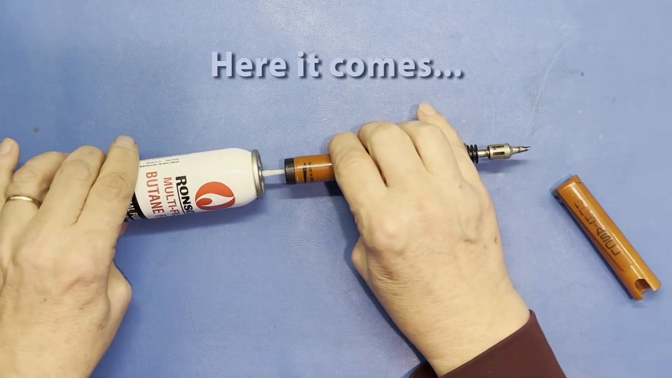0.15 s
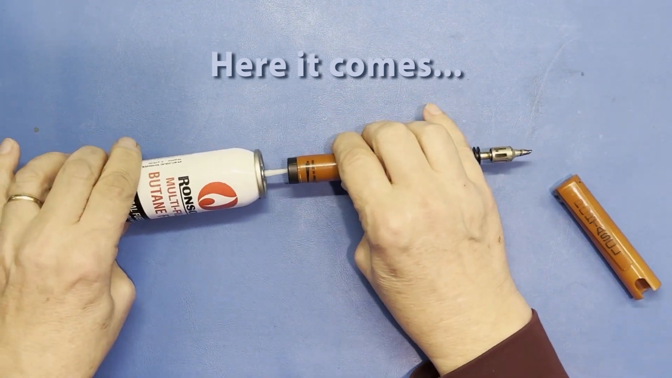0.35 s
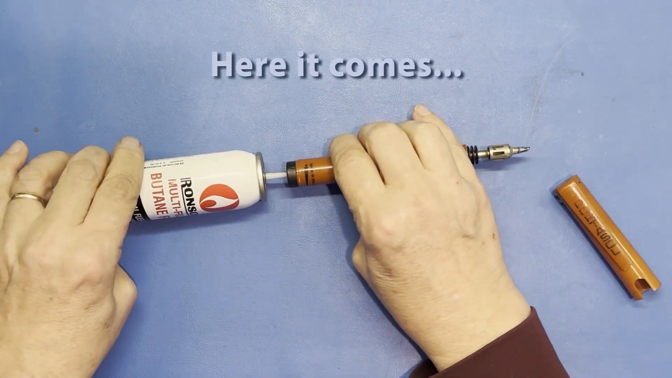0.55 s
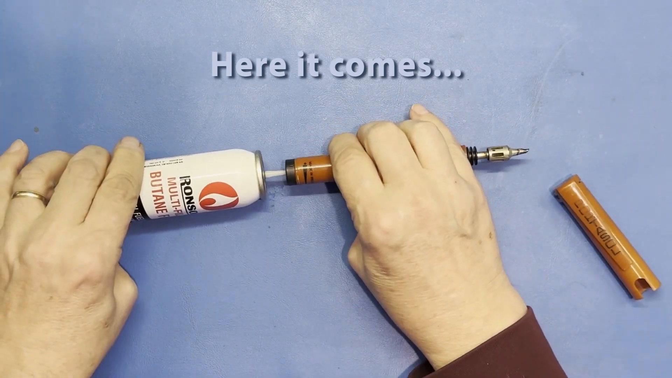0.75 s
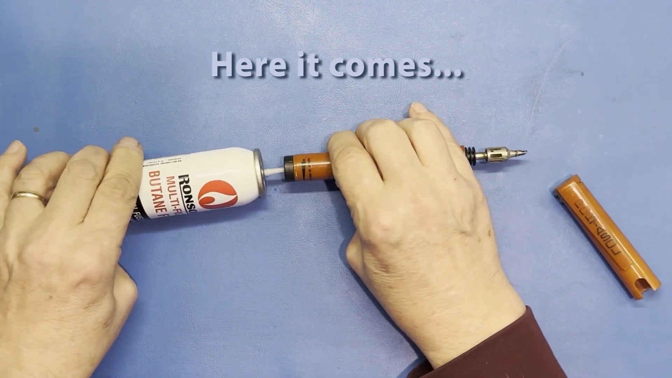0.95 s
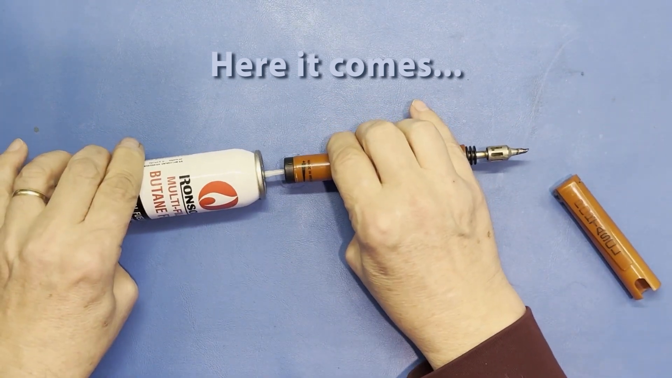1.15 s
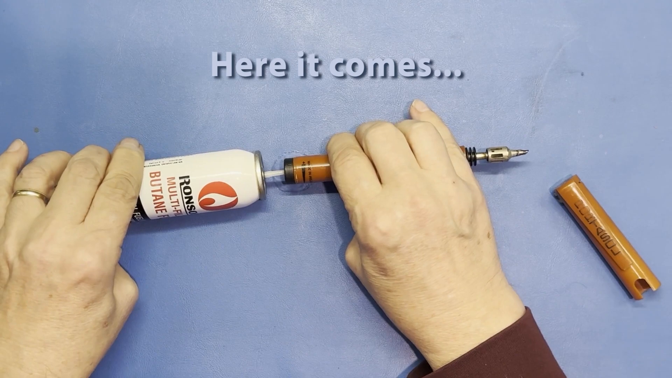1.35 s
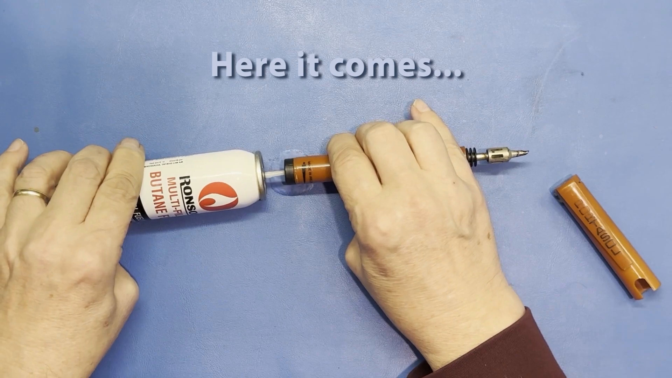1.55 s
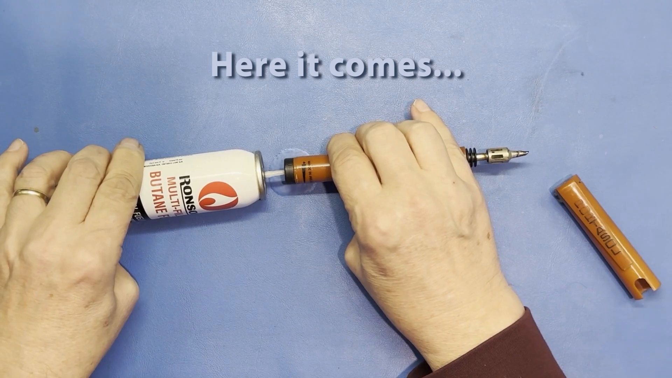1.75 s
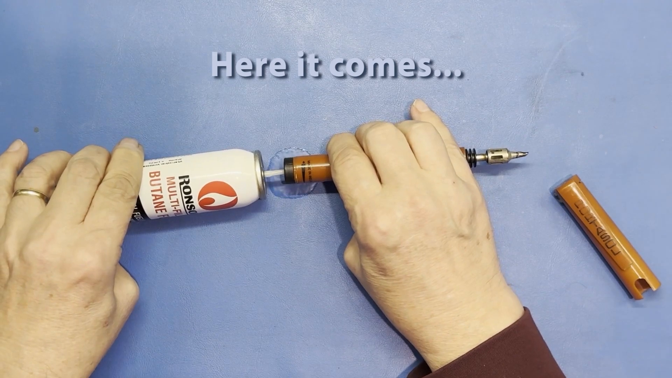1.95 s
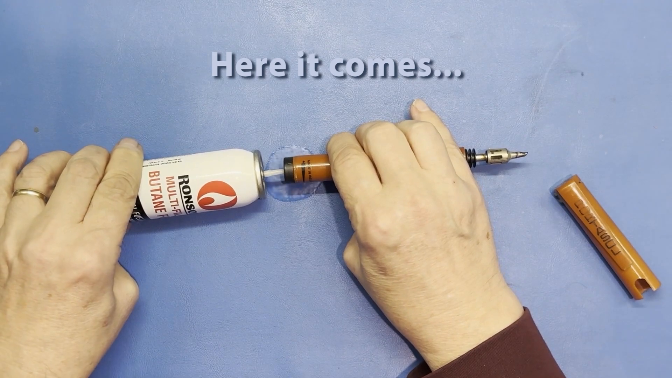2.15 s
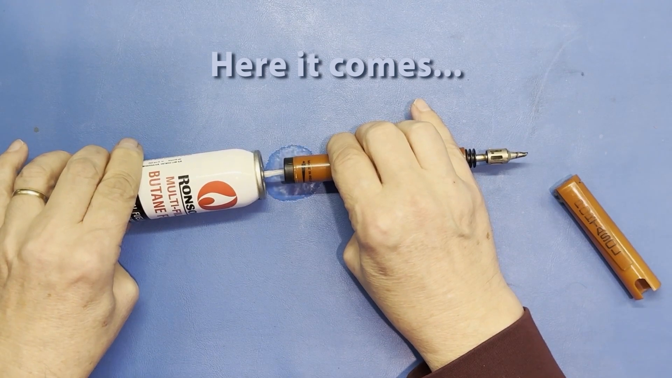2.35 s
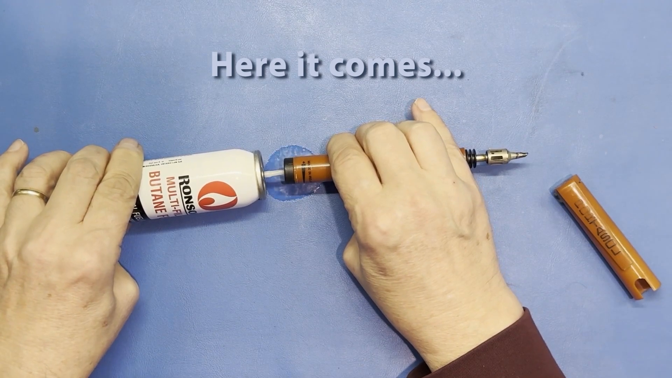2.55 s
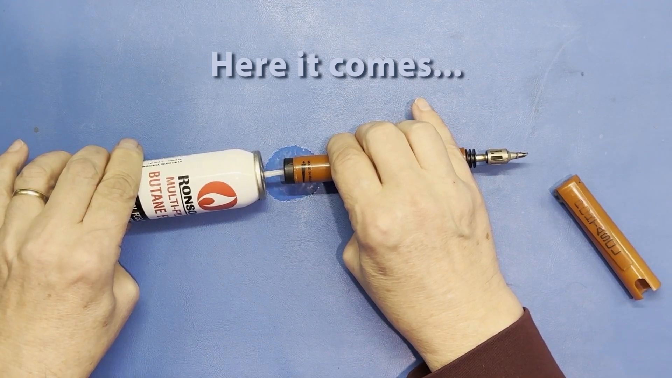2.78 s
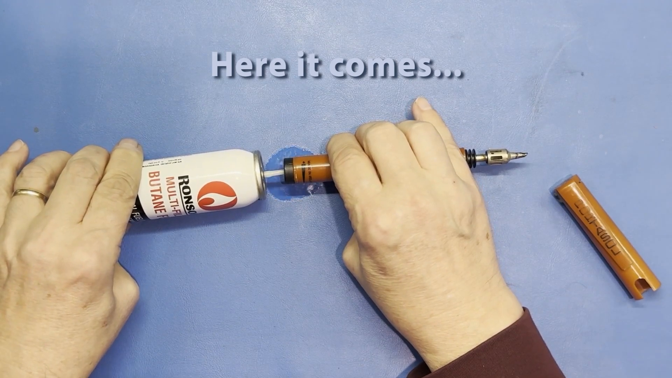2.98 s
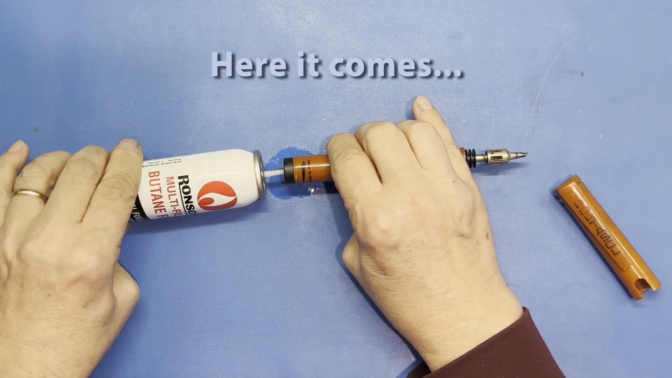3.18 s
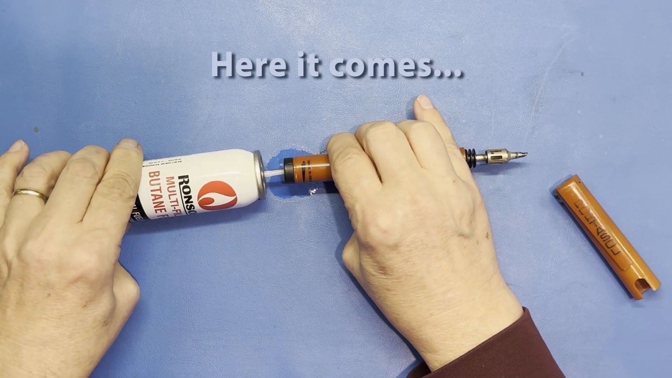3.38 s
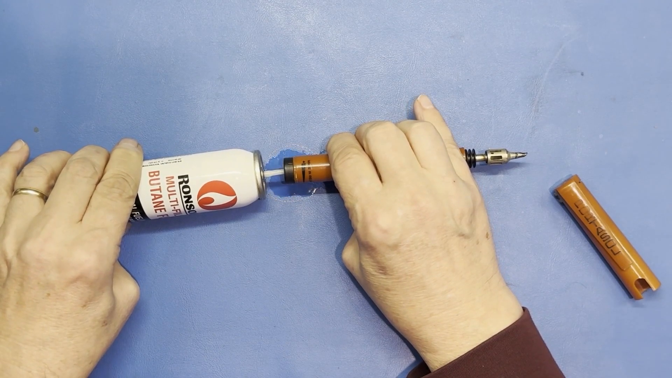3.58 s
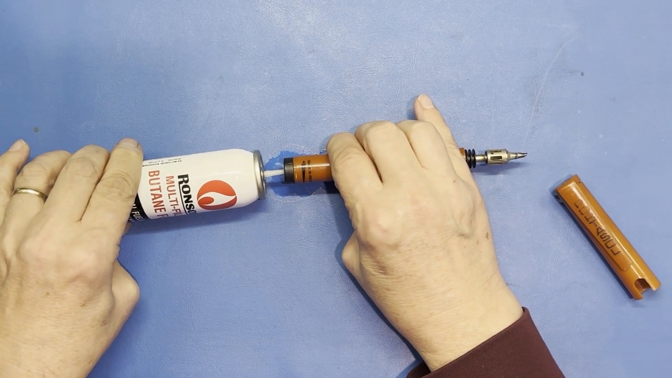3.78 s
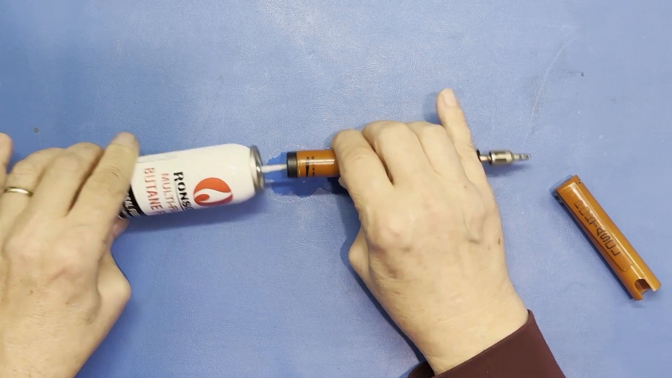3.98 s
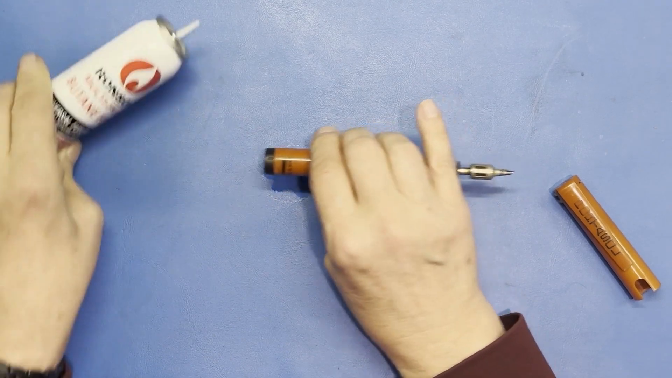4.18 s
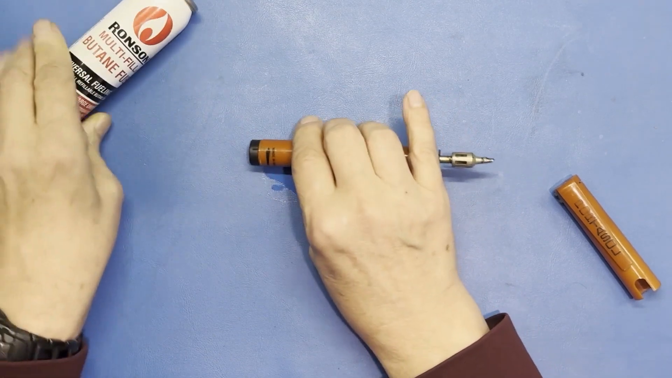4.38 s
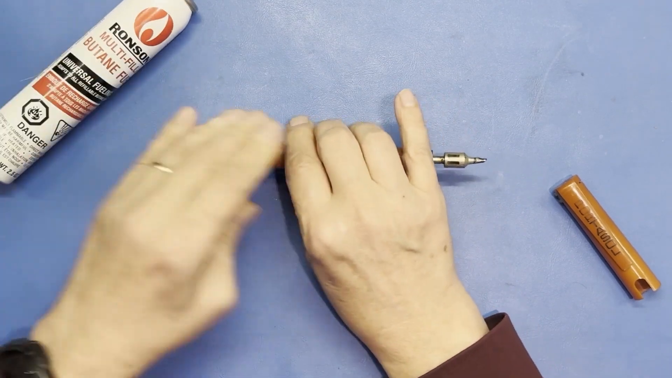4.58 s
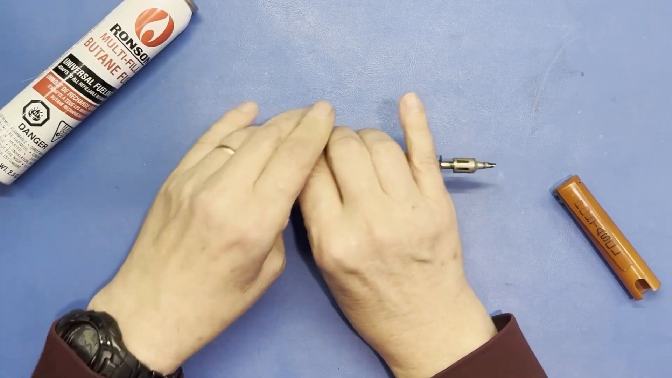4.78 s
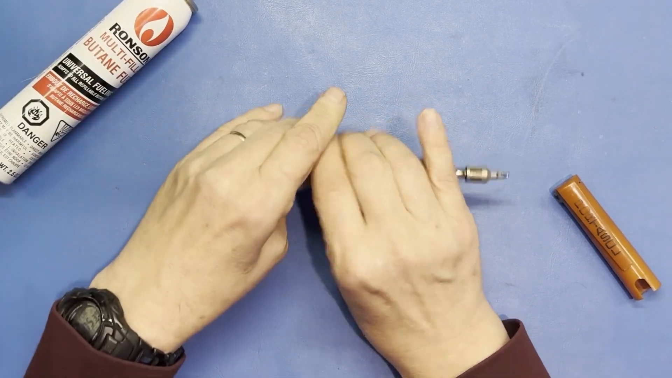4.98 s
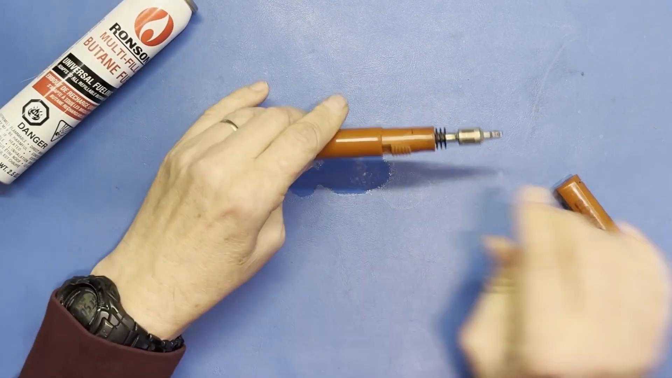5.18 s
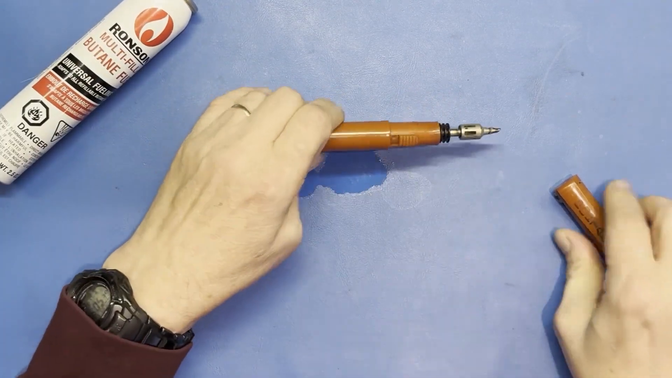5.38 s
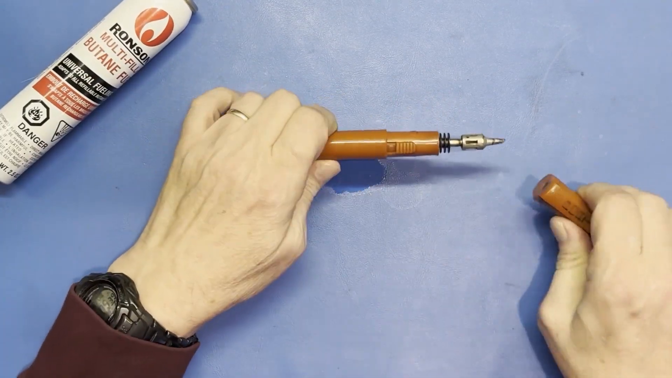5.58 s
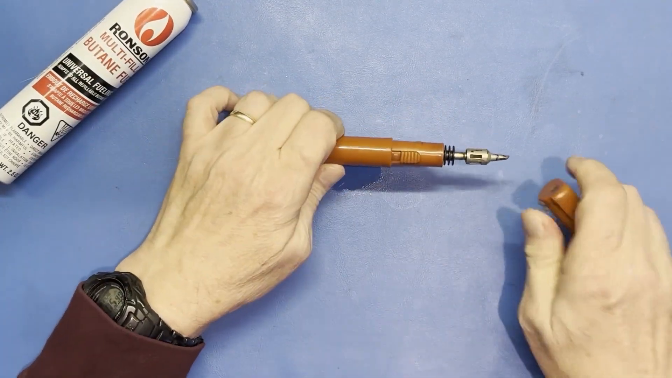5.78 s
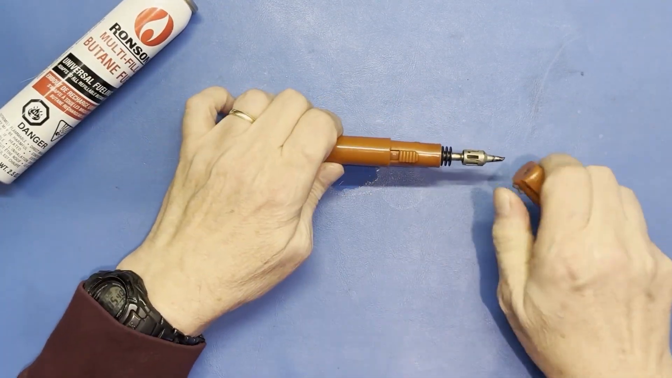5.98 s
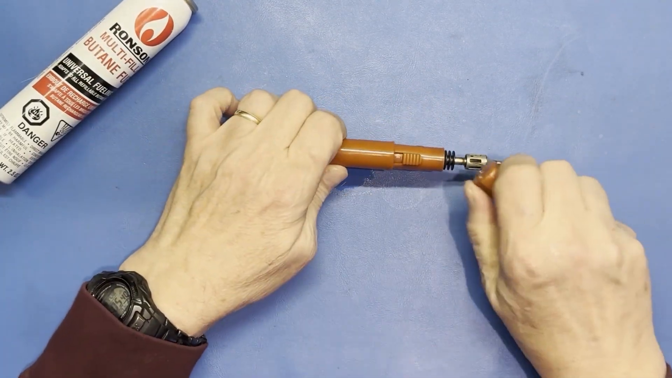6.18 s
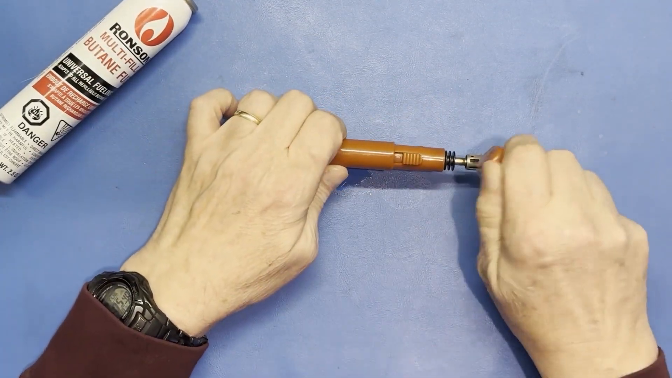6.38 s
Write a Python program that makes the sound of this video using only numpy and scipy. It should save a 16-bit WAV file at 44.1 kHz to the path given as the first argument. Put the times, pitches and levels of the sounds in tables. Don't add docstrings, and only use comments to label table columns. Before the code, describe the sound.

In a quiet room with low rumble, gas starts hissing from a can pressed to a small tool's valve. A hard snap sounds as it seats, the hiss sputters and surges for about three seconds, then cuts off. Soft fizz lingers while the can is set down with hollow knocks, and fingers rub and tick on plastic. Close stereo microphone, very little echo.

```python
import sys
import numpy as np
from scipy import signal
from scipy.fft import rfft, irfft, next_fast_len
from scipy.io import wavfile
from scipy.ndimage import uniform_filter1d, map_coordinates

SR = 44100
rng = np.random.default_rng(int(sys.argv[2]) if len(sys.argv) > 2 else 0)


def ratio(d):
    e = np.asarray(d, float) / 20
    return 10 ** e


def generate_wav(sig):
    pcm = np.round(np.clip(np.atleast_2d(sig).T, -1, 1) * 32767).astype(np.int16)
    wavfile.write(sys.argv[1], SR, pcm)


N = 283563

# (frequency [Hz], level [dB per Hz])
ROOM_COLOUR = [(88, -34.5), (150, -7), (325, -13), (425, -14.5), (500, -17), (729, -17.5), (1100, -26.5),
               (7960, -33), (10100, -53), (11000, -38), (14300, -78.5), (22000, -120)]
# (frequency [Hz], width [Hz], level [dB])
HUM = [(122, 10, -73), (486.7, 5, -81.5)]
# (frequency [Hz], level [dB per Hz])
RUMBLE_COLOUR = [(8.8, -40), (15, 8.5), (41, -0.5), (51, -11.5), (60, -9.5), (91, -22.5), (113, -14),
                 (147, -35), (300, -30), (390, -35), (660, -120)]
# (frequency [Hz], likeness [-1 to 1])
RUMBLE_ALIKE = [(30, -0.82), (60, -0.7), (130, -0.47), (290, 0.36)]
# (time [s], level over the rumble [dB], half length [s])
SHOVES = [
    (.14, 7, 0.19),
    (.68, 10, 0.32),
    (1.25, 8, 0.26),
    (2.6, 3.5, 1.4),
    (4.05, 10, 0.29),
    (4.38, 9, 0.14),
    (4.55, 6.5, 0.25),
    (6.16, 3, .1),
]
# (frequency [Hz], time to fall 60 dB [s])
ROOM_DECAY = [(200, 0.13), (2000, 0.062), (10000, 0.14)]
# (left delay [ms], right delay [ms], level [dB])
NEAR_ECHOES = [(.66, 0.706, -26), (.91, 0.968, -19.5), (1.25, 1.3, -34), (2.25, 2.2, -17), (4.6, 4.1, -19),
               (7.9, 8.8, -19)]
# (start [s], end [s], frequency [Hz], half width [Hz], level [dB])
HAND_SHADES = [(.53, .8, 8550, 420, -10), (.3, .54, 6400, 300, 6), (.3, .54, 10000, 450, -5),
               (.3, .42, 3200, 500, 8), (.8, 1.1, 12550, 300, -5), (.5, 1.1, 11400, 450, 6.5),
               (.85, 2, 5250, 250, -4), (2, 3.9, 5550, 200, -3), (.5, 1.1, 12900, 500, -6),
               (.8, 1.15, 4800, 250, -5), (.5, .8, 3500, 300, 3), (.5, .8, 4800, 300, -3),
               (1.9, 2.7, 10050, 350, -7), (1.15, 3.9, 11350, 300, -3), (1.9, 3.3, 6750, 250, -3),
               (3.2, 3.9, 9300, 200, 4), (3.1, 3.9, 10250, 300, 4), (3.1, 3.9, 8200, 200, -3),
               (2.7, 3.9, 8950, 150, -3), (1.1, 2, 6500, 250, -4), (.8, 3.9, 3500, 120, -1.5),
               (.8, 3.9, 2250, 120, -3)]
# (start [s], end [s], frequency [Hz], drift [Hz per s], share of time emptied [0-1])
ECHO_NULLS = [(.8, 3.88, 2250, 0, .5), (2.2, 3.88, 3470, 0, .65), (.8, 2.2, 3500, 0, .25),
              (.5, 3.88, 3830, 0, .15), (.82, 3.88, 5150, 150, .85), (.8, 2.1, 4850, 60, .4),
              (2.1, 3.88, 4950, 0, .15), (.5, 1.1, 10600, -300, .6), (1.15, 3.88, 11380, 0, .8),
              (1.15, 3.88, 10740, 0, .2), (1.2, 2.7, 9900, 0, .2), (1.05, 3.6, 13200, 0, .2),
              (4.3, 5.75, 10800, 0, .6), (5.02, 5.3, 5600, 1200, .8)]
# (treble level [dB], frequency [Hz], flutter [Hz])
TOP_EDGE = [(-80, 10450, 50), (-77, 12400, 600), (-66, 12500, 600), (-62, 13300, 500), (-45, 13850, 650),
            (-30, 13800, 250)]
# (time [s], peak level [dB], knock over peak [dB], wobble over peak [dB])
THUDS = [(0.075, -55, -7, -23), (.343, -61, -8, -20), (0.4205, -51, -6, -12), (.433, -56, -3, -20),
         (1.104, -39, -16, -18), (3.884, -43, -8, -20), (4.1673, -26.5, -13.5, -16),
         (4.2175, -21.5, -11, -30), (4.2643, -27, -11.5, -20), (4.2953, -24, -8.5, -12),
         (4.231, -44, 0, -20), (4.272, -41, -6, -20), (4.307, -44, -2, -5), (4.333, -54, 2, -10),
         (4.38, -53, -21, 5), (4.708, -49, -3, -4), (4.714, -51, -3, 1), (4.722, -56, -20, 9),
         (4.738, -60, -20, 11), (5.308, -60, -28, 17), (5.343, -57, -18, -4), (5.38, -54.5, -28, 14.5),
         (5.399, -54, -20, 9), (5.423, -59, -20, 10), (5.46, -60.5, -20, 12.5)]
# (frequency [Hz], width [Hz], level [dB])
TABLE_MODES = [(96, 130, -1.5), (180, 200, -30), (245, 45, -3)]
# (frequency [Hz], width [Hz], level [dB])
CAN_MODES = [(382, 30, 9), (466, 30, 13.5), (600, 460, 11.5), (672, 55, 11), (1300, 500, -19),
             (2300, 310, 1)]
# (time [s], peak level [dB], frequency [Hz], body over ring [dB], left minus right [dB])
TICKS = [(.071, -66, 2200, -6, 0), (.122, -64, 3300, -6, 0), (3.9419, -28.5, 9300, -24, -3),
         (4.157, -37, 2700, -4, -8), (4.053, -44, 6000, -10, 0), (4.167, -45, 2240, -8, 0),
         (4.2172, -36, 4200, -1, 0), (4.2635, -35, 5000, -4, 0), (4.2917, -32, 2250, -12, -5),
         (4.29, -34, 3380, 1, -4), (4.363, -40, 4230, -20, -3), (4.622, -42, 12000, -14, 0),
         (4.9558, -30.5, 6760, -15, -2), (4.9889, -47, 4230, -10, -14.5), (5.086, -44, 4350, -3, -3),
         (5.1094, -35, 9050, -14, 0.5), (5.1125, -36, 12500, -24, 0), (5.138, -33, 12000, -19, 0.5),
         (5.146, -34, 7000, -11.5, 0), (5.155, -33, 12000, -24, -2), (5.1644, -31, 12100, -16, -2),
         (5.177, -32, 12400, -17, 3.5), (5.218, -36, 9600, -15, 1), (5.2707, -35, 11750, -20, -0.5),
         (5.296, -28.5, 8500, -38, 2), (5.339, -36, 8000, -20, 0), (5.347, -38, 7400, -10, 0),
         (5.353, -40, 8500, -20, 0), (5.36, -41, 7000, -20, 0), (5.372, -34, 2880, -12, 2),
         (5.406, -38, 3100, -8, 0), (5.433, -43, 1500, -6, 0), (5.505, -39, 3220, -7, 4),
         (6.3494, -23, 6910, -20, 2)]
# (frequency [Hz], level [dB per Hz])
GRAZE_COLOUR = [(1470, -36), (2500, -19.5), (4990, -14), (7650, 0), (8670, -11), (9530, -4), (10600, -17),
                (12400, -9), (13300, -12), (14500, -62)]
# (time [s], level [dB])
BOIL = [
    (3.88, -51),
    (3.96, -53),
    (4.09, -57.5),
    (4.36, -56),
    (4.9, -58),
    (5.17, -63),
    (5.34, -59),
    (5.7, -60),
    (6.25, -57),
]
# (frequency [Hz], level [dB per Hz])
FIZZ_COLOUR = [(1120, -57.5), (1900, -23.5), (1990, -31), (2110, -15), (2430, -12), (2760, -9.5),
               (3000, -2), (3200, -4.5), (3440, -6.5), (3690, -4), (3830, -6), (4420, -3), (4740, -6.5),
               (5800, -23), (7540, -44), (12800, -120)]
# (frequency [Hz], likeness [-1 to 1])
FIZZ_ALIKE = [(300, 0.213), (1400, 0.84), (3500, 0.91), (7000, 0.13), (14000, 0.736)]
# (time [s], frequency [Hz], level [dB])
HOLLOW = [(3.9, 4390, -55), (4.13, 4300, -61), (4.33, 4270, -58.5), (4.43, 4280, -51), (4.53, 4000, -64),
          (4.85, 3960, -63), (5.1, 4400, -65), (5.45, 4284, -65), (5.62, 4565, -62), (5.9, 4320, -63),
          (6.2, 4170, -62), (6.43, 4340, -68)]
# (frequency [Hz], level [dB per Hz])
SEEP_COLOUR = [(3120, -37), (5300, -7.5), (6300, -4), (7200, 0), (8300, -6), (10000, -0.5), (10700, -8.5),
               (11000, -32.5), (14300, -55), (22000, -120)]
# (frequency [Hz], level [dB per Hz])
RUB_COLOUR = [(10200, -38.5), (10900, -6), (11500, 0), (12300, 0), (13200, -3.5), (14500, -12.5),
              (15600, -15.5), (16500, -54)]
# (frequency [Hz], level [dB per Hz])
RUSTLE_COLOUR = [(240, -42), (400, -23), (449, -18), (641, -6), (748, -10), (1190, -5.5), (1350, -8),
                 (2200, -8.5), (2940, -10), (4000, -8), (5200, -36.5), (8800, -120)]
# (time [s], effort [dB])
FINGERS = [
    (4.9, -36),
    (4.96, -8),
    (5.05, -5),
    (5.12, 0),
    (5.19, -4),
    (5.34, -6),
    (5.57, -5.5),
    (5.66, -8.5),
    (5.76, -24),
    (5.8, -34),
]
# (time [s], level over the rustle [dB], half length [s])
DRAGS = [
    (4.957, 4, .008),
    (5.11, 6, .05),
    (5.39, 11, 0.028),
    (5.45, 8, 0.047),
]
# (time [s], peak level [dB])
SNAP = [
    (0.7792, -6.5),
]
# (frequency [Hz], width [Hz], level [dB])
VALVE_MODES = [(75, 80, -14), (330, 400, -15.5), (706, 38, -5), (1000, 900, -18), (2500, 1400, -19),
               (3520, 130, -7), (5850, 550, -4), (7100, 450, -6), (9400, 450, -24)]
# (frequency [Hz], left minus right [dB])
SNAP_PAN = [(60, 8.5), (110, 0.5), (200, -9.5), (380, -2.5), (700, -6.5), (1290, -5.5), (2380, -1),
            (4400, 2.5), (8120, 0.5), (15000, 1)]
# (time [s], flow level [dB], loose fit [0-1])
FLOW = [(.436, -43, 0.6), (.52, -33, 0.43), (.56, -29.5, 0.64), (.76, -25, 0.85), (.82, -25, 0.32),
        (.97, -22.5, 0.6), (1.07, -24, 0.72), (1.15, -27.5, 0.26), (1.5, -33, 0.56), (1.75, -33, 0.38),
        (2.02, -28, 0.28), (2.09, -25, 0.3), (2.28, -23, 0.12), (2.65, -29, 0.31), (2.85, -25.5, 0.23),
        (3.57, -23, 0.07), (3.8, -20.5, 0.07), (3.84, -18.5, 0.43)]
# (time [s], surge [dB], half length [s])
SLUGS = [(.79, 3, .012), (1.11, -6, .028), (1.25, 0, .02), (1.64, 2, 0.086), (2.035, -3, 0.027),
         (2.36, -3, 0.034), (2.4, 3.5, 0.022), (2.685, 3.5, 0.016), (3.085, 1.5, 0.038), (3.115, -4, 0.016),
         (3.21, 0, 0.028), (3.605, -3, 0.0089), (3.625, 2.5, 0.01), (3.67, -2, .015), (3.7, 4, 0.011),
         (3.76, 1, .012)]
# (frequency [Hz], level [dB per Hz])
JET_COLOUR = [(3240, -55), (5500, -26.5), (6210, -9.5), (6670, -7.5), (7060, 0), (7360, -0.5), (8670, -0.5),
              (9740, -5.5), (10500, -7), (11200, -12.5), (14600, -40), (22000, -120)]
# (frequency [Hz], level [dB per Hz])
BODY_COLOUR = [(150, -62), (250, -26), (429, -24), (636, -14), (839, -15), (920, -13), (1130, -17),
               (1600, -8.5), (2050, -11.5), (2240, -14.5), (2670, -5), (2970, -5.5), (3430, -8),
               (4170, -2.5), (5500, -9), (5800, -8), (7540, -13), (12800, -120)]
# (frequency [Hz], level [dB per Hz])
TOP_COLOUR = [(10600, -32.5), (11300, -8), (11800, 1), (12300, 2.5), (13000, -7.5), (13800, 2), (14600, -5),
              (15600, -18), (16500, -63.5)]
# (frequency [Hz], likeness [-1 to 1])
JET_ALIKE = [(250, .6), (600, .97), (3200, .99), (3500, .7), (4200, .85), (5400, .45), (7300, .9),
             (8600, .7), (11000, .15), (12300, .55), (14000, .2)]
# (time [s], frequency [Hz], level over the core [dB])
NOZZLE = [
    (0.45, 7610, -5.5),
    (0.6, 7640, -3.5),
    (0.78, 7140, -4.5),
    (0.88, 7940, -8),
    (1.29, 8100, -5.5),
    (2.99, 7730, -6.5),
    (3.64, 7814, -8.5),
    (3.75, 7420, -11),
    (3.84, 7760, -9),
    (3.88, 7330, -9.5),
]


def unit(x):
    return x / np.sqrt(np.mean(x ** 2) + 1e-20)


def along(points, hz):
    f, v = np.transpose(points)
    return np.interp(np.log(hz + 1), np.log(f + 1), v)


def curves(rows):
    s, *cols = np.transpose(rows)
    return [np.interp(np.arange(N) / SR, s, c) for c in cols]


def bumps(rows):
    t = np.arange(N) / SR
    return sum(db * np.exp(-((t - s) / half) ** 2) for s, db, half in rows)


def slopes(start, end, rise_db, fall_db):
    t = np.arange(N) / SR
    return -rise_db * np.clip(start - t, 0, 9) - fall_db * np.clip(t - end, 0, 9)


def wobble(rate):
    knots = rng.standard_normal(int(N * rate / SR) + 4)
    return map_coordinates(knots, [np.arange(N) * rate / SR])


def filtered(x, response):
    m = next_fast_len(N + SR // 2)
    return irfft(rfft(x, m) * response(np.fft.rfftfreq(m, 1 / SR)), m)[..., :N]


def modes(rows):
    def one(f, c, w, db):
        return ratio(db) * 1j * f * w / (c * c - f * f + 1j * f * w)
    return lambda f: sum((-1) ** k * one(f, *row) for k, row in enumerate(rows))


def strikes(times, gains):
    return np.bincount(np.round(np.asarray(times) * SR).astype(int), gains, N)


def rush(spectrum, alike, patchy_db, sputter=1, lag_s=0):
    z = signal.stft(rng.standard_normal((2, N)), nperseg=512)[2]
    field = uniform_filter1d(uniform_filter1d(rng.standard_normal(z.shape[1:]), 6, 0), 10, 1)
    pair = signal.istft(z * ratio(patchy_db * unit(field)), nperseg=512)[1][:, :N] * sputter

    def spread(hz):
        turn = np.arccos(np.clip(along(alike, hz), -1, 1)) / 2
        return ratio(along(spectrum, hz)) * [np.cos(turn), np.sin(turn)]

    def late(hz):
        return np.exp(-1j * np.pi * hz * lag_s * np.array([[1], [-1]]))

    mid, side = filtered(pair, spread)
    both = np.array([mid + side, mid - side])
    return unit(filtered(both, late) if lag_s else both)


def drifting(hz, width_hz, alike):
    span = max(int(SR / width_hz / 2), 1)
    slow = uniform_filter1d(uniform_filter1d(rng.standard_normal((2, 2, N)), span), span)
    turn = 2 * np.pi * np.cumsum(hz + np.zeros(N)) / SR
    mid, side = slow[0] * np.cos(turn) + slow[1] * np.sin(turn)
    side = side * np.sqrt((1 - min(alike, 1)) / (1 + alike))
    return unit(np.array([mid + side, mid - side]))


def background():
    air = ratio(-72.5) * rush(ROOM_COLOUR, FIZZ_ALIKE, patchy_db=2.0)
    hum = 0
    for hz, width, db in HUM:
        hum = hum + ratio(db) * unit(filtered(rng.standard_normal(N), modes([(hz, width, 0)])))
    rumble = ratio(-52.5 + bumps(SHOVES)) * rush(RUMBLE_COLOUR, RUMBLE_ALIKE, patchy_db=2.5)
    return air + hum + rumble * ratio([[1.6], [-1.6]])


def room(x):
    hz, t, z = signal.stft(rng.standard_normal((2, SR // 2)), SR, nperseg=256)
    tail = signal.istft(z * ratio(-60 * t / along(ROOM_DECAY, hz)[:, None]), SR, nperseg=256)[1]
    delayed = np.pad(x, ((0, 0), (250, 0)))
    return signal.fftconvolve(delayed, tail / np.linalg.norm(tail[0]), axes=1)[:, :N]


def near(x):
    fade_s = 0.04
    f, t, z = signal.stft(x, SR, nperseg=1024)
    comb, shade_db = 1, 0
    for left, right, db in NEAR_ECHOES:
        comb = comb + ratio(db) * np.exp(-2j * np.pi * f * np.array([[left], [right]]) / 1000)
    for start, end, hz, width, db in HAND_SHADES:
        during = np.clip(np.minimum(t - start, end - t) / fade_s + .5, 0, 1)
        shade_db = shade_db + db * np.exp(-((f[:, None] - hz) / width) ** 2) * during
    return signal.istft(z * comb[..., None] * ratio(shade_db), SR, nperseg=1024)[1][:, :N]


def creak():
    start_s, length_s = 0.88, 0.13
    wall = modes([(386.5, 28, 0)])
    hum = unit(filtered(rng.standard_normal(N), lambda f: wall(f) ** 2))
    return ratio(-59 + slopes(start_s, start_s + length_s, 300, 300)) * hum


def thuds():
    s, db, knock_db, wobble_db = np.transpose(THUDS)

    def table(f):
        return modes(TABLE_MODES)(f) / (1 + 1j * f / 500) ** 2

    def can(f):
        return sum(modes([row])(f) for row in CAN_MODES) / (1 + 1j * f / 800) ** 3

    boom = filtered(strikes(s + .001, ratio(db + 36.5)), table)
    rocking = 1.7 * filtered(boom, lambda f: 1j * f / (90 + 1j * f) / (1 + 1j * f / 280) ** 2)
    knock = filtered(strikes(s, -ratio(db + knock_db + 31.0)), can)
    stand = filtered(strikes(s, ratio(db + wobble_db + 53.0)),
                     lambda f: modes([(70, 16, 0)])(f) / (1 + 1j * f / 150))
    sway = filtered(strikes(s, ratio(db + wobble_db + 51.5)),
                    lambda f: modes([(31, 2.5, 0)])(f) / (1 + 1j * f / 60))
    out = boom * ratio([[1.5], [-1.5]]) + rocking * np.array([[1], [-1]])
    out = out + knock * np.array([[.85], [1.15]]) + stand * np.array([[1.05], [.95]])
    return out + sway * np.array([[4], [-2.5]])


def ticks():
    out, t = np.zeros((2, N + SR)), np.arange(SR // 50) / SR
    for s, db, hz, low_db, pan_db in TICKS:
        grit = rng.standard_normal((3, len(t)))
        ring = ratio(-60 * t / 0.0056) * (np.sin(2 * np.pi * hz * t) + np.diff(grit[:2], prepend=0))
        body = ratio(low_db - 60 * t / 0.02) * uniform_filter1d(grit[2], size=7) * 1.42
        gain = ratio(db - 0.5 + pan_db / 2 * np.array([[1], [-1]]))
        soft_start = 1 - np.exp(-t / 0.00053)
        out[:, round(s * SR):][:, :len(t)] += gain * (ring + body) * soft_start
    return out[:, :N]


def graze():
    time_s = 6.346
    scratch = rush(GRAZE_COLOUR, FIZZ_ALIKE, patchy_db=4.0, sputter=ratio(2.5 * wobble(700)))
    return ratio(-30.5 + slopes(time_s, time_s, 1703, 2000)) * scratch * ratio([[-1.5], [1.5]])


def puddle():
    t = np.arange(N) / SR
    since = t - BOIL[0][0]
    fizz_db, effort = curves(BOIL)[0], ratio(curves(FINGERS)[0])
    wet = np.clip(since / 0.057, 0, 1)
    bubbling = ratio(.4 * wobble(30) + 1.2 * wobble(400))
    slips = ratio(0.52 * wobble(90) + 2.0 * wobble(360))

    def vent(db, fall_db):
        return ratio(db - fall_db * np.abs(since))

    fizz = ratio(fizz_db) * rush(FIZZ_COLOUR, FIZZ_ALIKE, patchy_db=.7, sputter=bubbling)
    fizz = fizz * ratio([[1.6], [-1.6]])
    echo = filtered(fizz, modes([(3620, 550, 0)]))
    lifted = np.clip((t - 5.47) / 0.073, 0, 1) * (1 - .45 * np.clip((t - 5.92) / .1, 0, 1))
    fizz = fizz - 0.86 * lifted * echo

    hollow_hz, hollow_db = curves(HOLLOW)
    hollow = ratio(hollow_db) * bubbling * drifting(hollow_hz, width_hz=170, alike=0.54)
    hollow = hollow * ratio([[1.5], [-1.5]])

    scrape_s, scrape_length_s = 5.37, .05
    scrape = ratio(-58 + slopes(scrape_s, scrape_s + scrape_length_s, 1500, 80))
    scrape = scrape * slips * drifting(3150, width_hz=900, alike=.8)

    seep = vent(-50, 34) + ratio(-67) + ratio(-63) * effort ** 0.71
    seep = seep * rush(SEEP_COLOUR, FIZZ_ALIKE, patchy_db=0.8)
    rub = vent(-65, 14) + ratio(-58) * effort
    rub = rub * rush(RUB_COLOUR, FIZZ_ALIKE, patchy_db=2.5, sputter=slips)
    rustle = vent(-66.5, 15) + ratio(-80.5) + ratio(-75 + bumps(DRAGS)) * effort ** 0.82
    rustle = rustle * ratio(5.0) * rush(RUSTLE_COLOUR, FIZZ_ALIKE, patchy_db=2.5, sputter=slips)
    return wet * (fizz + hollow + scrape + seep + rub + rustle)


def snap():
    time_s, peak_db = SNAP[0]
    t = np.arange(N) / SR - time_s - .0007
    burst = (t >= 0) * ratio(-60 * np.abs(t) / 0.021) * rng.standard_normal((2, N))
    burst = filtered(burst[0] + .5 * burst, lambda f: 1j * f / (1500 + 1j * f))

    def barrel(f):
        return modes(VALVE_MODES)(f) * ratio(along(SNAP_PAN, f) / 2 * np.array([[1], [-1]]))

    ring = filtered(0.078 * burst + strikes([time_s + 0.0008], [1.]), barrel)
    return ratio(peak_db + 5.5) * ring / np.abs(ring).max()


def jet():
    open_s, shut_s = 0.429, 3.876
    flow_db, loose = curves(FLOW)
    t = np.arange(N) / SR
    gate_db = slopes(open_s, shut_s, 1100, 762)
    linger_db = slopes(open_s, shut_s, 1100, 131) - 20
    whisper_db = -30 + slopes(.4, shut_s, 260, 762)
    gate_db = np.maximum(np.maximum(gate_db, linger_db), whisper_db)
    surge_db = bumps(SLUGS)
    spit = ratio(0.83 * wobble(250) + 1.7 * wobble(900))
    sputter = spit * ratio(0.12 * wobble(11) + 0.67 * wobble(60))

    core = rush(JET_COLOUR, JET_ALIKE, patchy_db=1.8, sputter=sputter, lag_s=2.3e-5)
    core = core * ratio([[-.5], [.5]])
    body_db = -19.5 + 4.5 * loose + 3.7 * np.exp(-t / 1.27)
    body_db = body_db + 9.9 * np.exp(-np.abs(t - open_s) / 0.18)
    body_db = body_db + 2.0 * np.exp(-((t - shut_s) / 0.063) ** 2)
    body = ratio(body_db) * rush(BODY_COLOUR, JET_ALIKE, patchy_db=1.06,
                               sputter=np.sqrt(spit * sputter), lag_s=1.2e-5)
    top = ratio(-12.3 + 11 * loose - 0.99 * surge_db)
    top = top * rush(TOP_COLOUR, JET_ALIKE, patchy_db=3.0, sputter=sputter, lag_s=.8e-5)
    nozzle_hz, nozzle_db = curves(NOZZLE)
    nozzle = ratio(nozzle_db) * sputter * drifting(nozzle_hz, width_hz=800, alike=0.53)
    choke = 1 - 0.74 * np.exp(-((t - SNAP[0][0] + 0.0028) / 0.0021) ** 4)
    return ratio(flow_db + surge_db + gate_db) * choke * (0.84 * core + nozzle + body + top)


def starved(x, margin_db):
    hz, t, z = signal.stft(x, SR, nperseg=2048, noverlap=1536)

    def held(count):
        return np.repeat(rng.random(len(t)), count)[:len(t)]

    energy = (np.abs(z) ** 2).sum(0)
    band = np.round(np.log1p(hz / 2500) * 34).astype(int)
    first = np.unique(band, return_index=True)[1]
    power = np.add.reduceat(energy, first) / np.bincount(band)[:, None]
    power = uniform_filter1d(power, size=2, axis=1)
    weak = power < uniform_filter1d(power, size=9, axis=0) * ratio(-2 * margin_db)
    empty = weak[band] & (hz[:, None] > 6000)

    fine = np.round(np.log1p(hz / 2500) * np.where(hz < 7000, 60, 30)).astype(int)
    fine = fine * np.where(hz < 7000, 1, 2)
    luck = np.array([np.roll(held(count=3), 37 * k) for k in range(fine.max() + 1)])[fine]
    centre_hz = 2500 * np.expm1(fine / 60)[:, None]
    for start, end, null_hz, drift, share in ECHO_NULLS:
        off = (centre_hz - null_hz - drift * (t - start)) / min(null_hz * .045, 330)
        empty |= (luck < share * np.exp(-off ** 2)) & (t > start) & (t < end)

    treble = (np.abs(z[:, (hz > 11000) & (hz < 13000)]) ** 2).sum((0, 1)) * 2 / 3
    treble_db = 10 * np.log10(np.abs(uniform_filter1d(treble, size=3)) + 1e-14)
    level_db, edge_hz, flutter_hz = np.transpose(TOP_EDGE)
    flutter = np.interp(treble_db, level_db, flutter_hz) * (3 * held(count=3) - 1.5)
    edge = np.interp(treble_db, level_db, edge_hz) + flutter
    edge = 689 * np.round(edge / 689)
    costly = treble > ratio(2 * -11.2) * energy.sum(0) * 2 / 3
    often = uniform_filter1d(costly * (treble_db > level_db[-2]) * 1., size=21) > .5
    edge = np.where(often, np.minimum(edge, 13050), edge)
    return signal.istft(z * ~empty * (hz[:, None] < edge), SR, nperseg=2048, noverlap=1536)[1][:, :N]


def scene():
    hits = snap() + thuds() + ticks() + graze()
    return near(jet()) + puddle() + background() + creak() + hits + ratio(-10.0) * room(hits)


def top_cut(x):
    return signal.sosfilt(signal.butter(12, 15690, fs=SR, output="sos"), x)


def record(dry):
    limited = dry / (1 + np.abs(dry / .7) ** 4) ** .25
    finished = starved(limited, margin_db=14.5)
    return top_cut(finished)


dry = scene()
out = record(dry)
generate_wav(out)
```